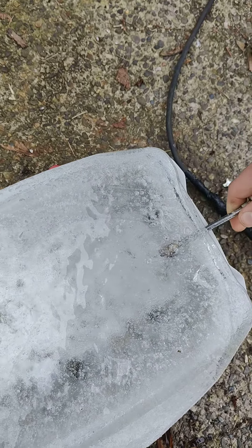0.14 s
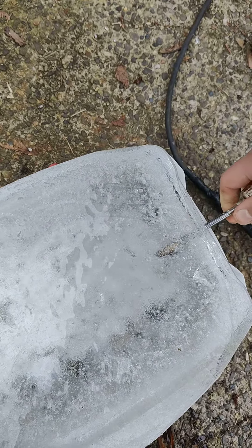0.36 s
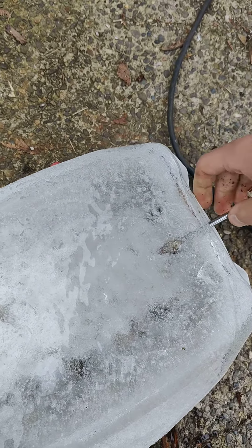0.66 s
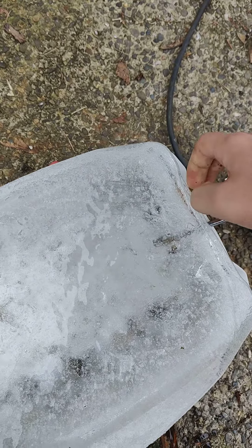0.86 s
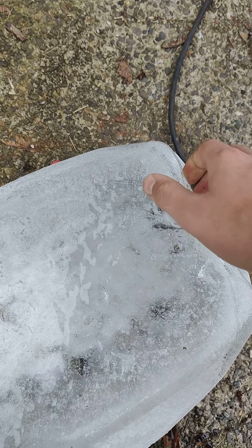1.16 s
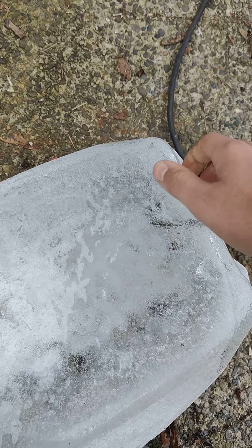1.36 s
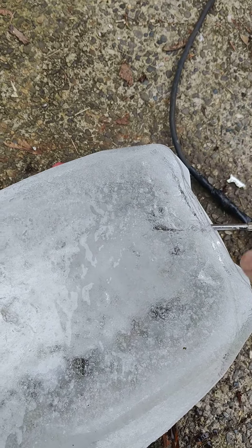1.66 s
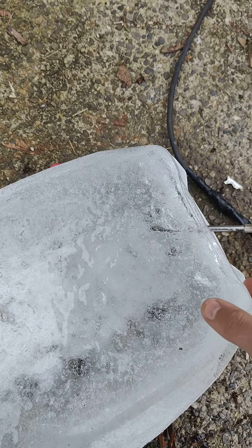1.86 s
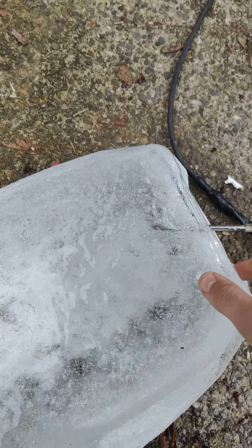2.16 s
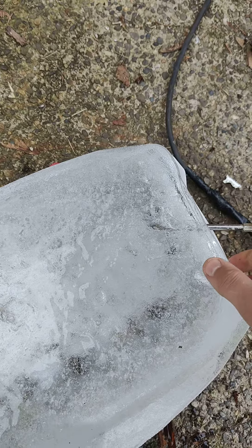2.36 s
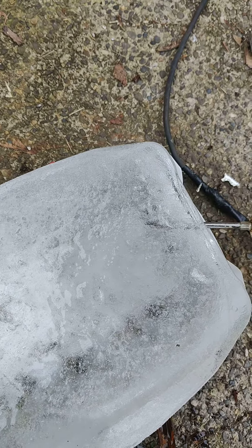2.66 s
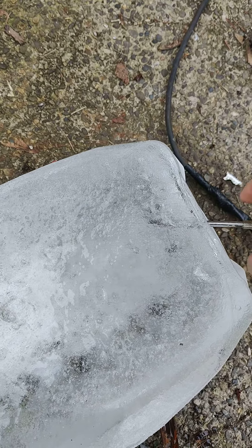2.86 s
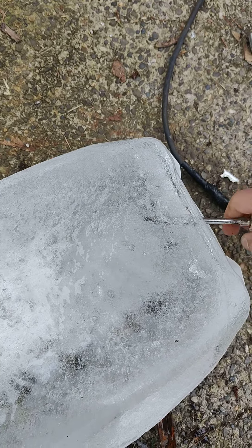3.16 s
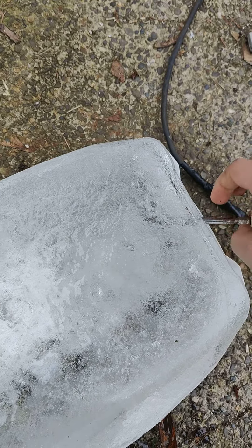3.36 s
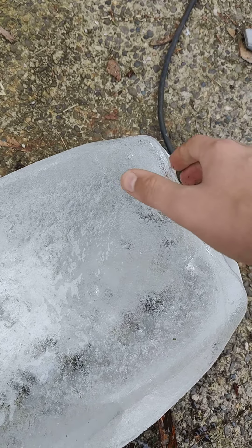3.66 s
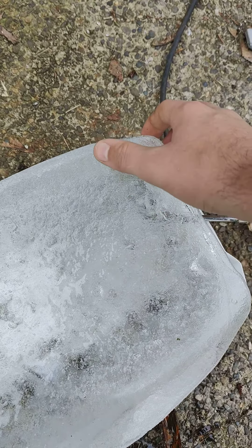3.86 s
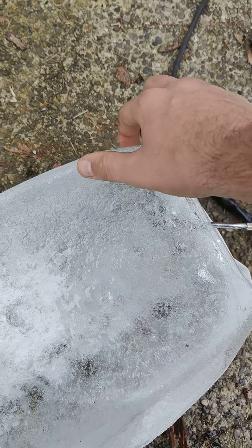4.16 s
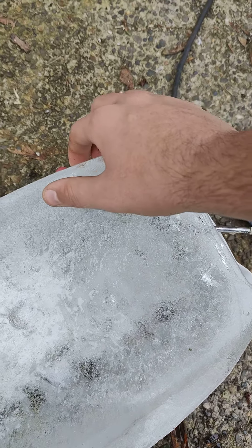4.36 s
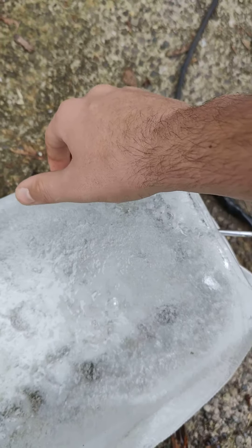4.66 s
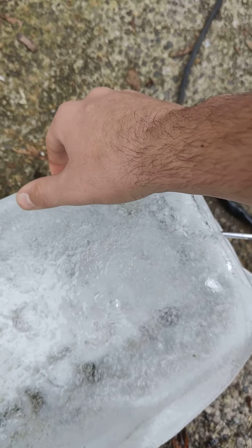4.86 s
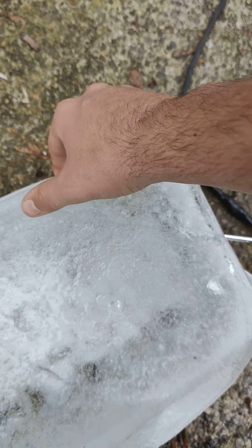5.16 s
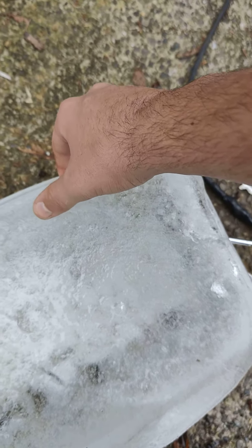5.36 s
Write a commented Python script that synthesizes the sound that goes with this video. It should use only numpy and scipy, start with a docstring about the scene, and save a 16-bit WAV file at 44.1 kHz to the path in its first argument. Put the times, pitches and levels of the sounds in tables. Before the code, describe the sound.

Ice is pried loose from a plastic tub with a thin metal tool, giving sharp cracks, hollow knocks and small scrapes outdoors.

```python
"""A quiet outdoor rumble, then cracks: a thin steel blade levers ice from a plastic tub on concrete. Each
brittle fracture is a burst of dense, fast-dying vibration that excites the damped modes of the hollow tub, the
ice slab, the plastic wall and the blade. Between cracks the tub knocks softly, the ice ticks and scrapes, and a
far vehicle passes. Meltwater squeaks once in a closing gap, and ice peels from the wall with a fine crackle
that swells near 4.8 s and again near 5.15 s, among the last cracks."""
import sys
import numpy as np
from scipy import signal
from scipy.fft import rfft, irfft, next_fast_len
from scipy.io import wavfile

SR = 44100
rng = np.random.default_rng(int(sys.argv[2]) if len(sys.argv) > 2 else 0)


def output_pcm(signal):
    """Save a mono or channel-first signal as 16-bit PCM at the path in sys.argv[1].

    Samples are clipped to [-1, 1] before scaling.
    """
    pcm = np.clip(np.atleast_2d(signal).T, -1, 1) * 32767
    wavfile.write(sys.argv[1], SR, np.round(pcm).astype(np.int16))


N = 242991
TIME = np.arange(N) / SR
RING_SAMPLES = 10800
AGE = np.arange(RING_SAMPLES) / SR  # seconds since a blow
THIRD_OCTAVES_HZ = 25 * 2 ** (np.arange(29) / 3)
SIDES = np.array([[1], [-1]])  # left, right


def undb(db):
    """Decibels to amplitude ratio."""
    return 10 ** (np.asarray(db) / 20)


def unit_rms(x):
    """Scale to rms 1."""
    return x / np.sqrt(np.mean(x ** 2))


def unit_blow(x):
    """Scale each channel to the energy of 10 ms at rms 1."""
    return x / np.sqrt(np.sum(x ** 2, axis=-1, keepdims=True) / (SR / 100) + 1e-18)


def at_hz(table, hz):
    """Interpolate a table's columns on a log-frequency axis."""
    f, *columns = np.transpose(table)
    return [np.interp(np.log(hz), np.log(f), column) for column in columns]


def add(out, start_s, sound):
    """Superpose a sound from start_s on."""
    i = int(start_s * SR)
    out[:, i:i + sound.shape[1]] += sound[:, :N - i]


def band_noise(hz, width_hz, size, patchy_db=0):
    """Two independent noises in one steep band; patchiness favours some frequencies, as mode clusters do."""
    n = next_fast_len(size, True)
    f = np.arange(n // 2 + 1) * SR / n
    passband = 1 / (1 + (2 * (f - hz) / width_hz) ** 6)
    clusters = np.interp(f, np.arange(100) * 240, rng.standard_normal(100))
    white = rfft(rng.standard_normal((2, n)))
    return unit_rms(irfft(white * passband * undb(patchy_db * clusters))[:, :size])


def third_octave(hz, correlation, size, patchy_db=0):
    """Partial coherence: mid and side noises mix into one stereo third-octave band."""
    mid, side = band_noise(hz, hz / 3.6, size, patchy_db)
    c = np.clip(correlation, -.99, .99)
    return np.sqrt((1 + c) / 2) * mid + np.sqrt((1 - c) / 2) * side * SIDES


def wander(rate_hz, size):
    """A continuous random fluctuation with a spread near 1."""
    steps = np.arange(size) * rate_hz / SR
    return np.interp(steps, np.arange(4096), rng.standard_normal(4096))


# Spectrum of the outdoor air. Each row: frequency in Hz, relative spectral density in dB.
AIR_SPECTRUM = [(15, -34.5), (25, -3.5), (69, -1), (139, -8), (191, -4.5), (224, -15), (488, -22.5),
                (529, -21), (729, -26), (1500, -29.5), (1960, -32), (2930, -28.5), (5280, -47.5),
                (13800, -54.5), (15000, -65.5)]
# Its stereo field. Each row: frequency in Hz, left minus right in dB, correlation of the channels.
AIR_FIELD = [(60, 2, 0.97), (193, .5, 0.97), (380, -1, .5), (700, 5, 0.22), (1300, -5, 0.26),
             (2405, 13.5, -0.45), (4400, 4.5, 0), (8000, 5, 0), (14690, -0.5, 0)]
def outdoor_air(level_db=-54):
    """Ambient noise, coherent at long wavelengths: a low rumble and faint hiss whose bands waver."""
    bands = 0
    for hz in THIRD_OCTAVES_HZ:
        pan_db, correlation = at_hz(AIR_FIELD, hz)
        band = third_octave(hz, correlation, N) * undb(SIDES * pan_db / 2)
        waver = undb(1.8 * wander(2.4, N))
        bands += np.sqrt(hz) * waver * band / np.std(band.mean(axis=0))  # equal power per Hz
    n = next_fast_len(N, True)
    colour_db = at_hz(AIR_SPECTRUM, np.arange(1, n // 2 + 2) * SR / n)[0]
    air = irfft(rfft(bands, n) * undb(colour_db), n)[:, :N]
    return air * undb(level_db) / np.std(air.mean(axis=0))


# Spectrum of a fracture. Each row: frequency in Hz, relative third-octave level in dB,
# left minus right in dB.
FRACTURE_SPECTRUM = [ (90.53, -26.5, 1.5), (174, -27.5, -1), (247, -8.5, 1), (322, -12.5, 4),
                     (450, 3.5, 8.5), (690.5, -13, 4.5), (953.6, -6, -4), (1705, -4.5, -4), (3200, -2, 1),
                     (4100, -5, -4.5), (5100, -13, -2), (6670, -11, 1), (7950, -18, 7.5),
                     (9810, -13.5, 6.5), (14500, -18, -5), ]
def fracture(thud_db, treble_db, t60, rise_s):
    """Modal overlap: a fracture runs in tiny jumps and shakes countless short modes that merge as noise."""
    jumps = undb(2.5 * wander(1400, RING_SAMPLES))
    ground_reflection = 1 + .5 * np.exp(-((AGE - .0062) / 0.0014) ** 2)
    attack = (1 - np.exp(-AGE / rise_s)) * jumps * ground_reflection
    yard_reverb = undb(-31) * np.exp(-np.log(1000) * AGE / 0.45)
    tilt = [(250, thud_db), (900, 0), (2000, 0), (8000, treble_db)]
    out = 0
    for hz in THIRD_OCTAVES_HZ[THIRD_OCTAVES_HZ > 90]:
        db, pan_db = at_hz(FRACTURE_SPECTRUM, hz)
        db += at_hz(tilt, hz)[0]
        band_t60 = t60 * (hz / 2000) ** -.13  # treble dies first
        decay = np.exp(-np.log(1000) * AGE / band_t60)
        correlation = 1 / (1 + (hz / 1200) ** 2)
        noise = third_octave(hz, correlation, RING_SAMPLES, patchy_db=5 * min(hz / 4000, 1))
        out += undb(db + SIDES * pan_db / 2) * unit_blow(noise * attack * (decay + yard_reverb))
    return out


def ring(modes, rise_s, pitch_hz=None, damping=1, scatter_db=0):
    """Free vibration is a sum of damped sines; pitch_hz retunes the first, damping divides decay times."""
    out = 0
    for k, (hz, db, t60, pan_db, lead) in enumerate(modes):
        if pitch_hz and k == 0:
            hz = pitch_hz
        # Where the blow lands scatters each mode's level and phase.
        offset_db, start_phase = scatter_db * rng.standard_normal(2)
        phase = 2 * np.pi * hz * AGE + start_phase + SIDES * lead / 2
        decay = np.exp(-np.log(1000) * AGE * damping / t60)
        out += undb(db + offset_db + SIDES * pan_db / 2) * np.sin(phase) * decay
    out *= 1 - np.exp(-AGE / rise_s)
    return out / np.sqrt(np.sum(out ** 2) / (2 * SR / 100))  # energy of 10 ms at rms 1


# Modes of the hollow tub. Each row: nominal frequency in Hz, relative level in dB, time to fall
# 60 dB in seconds, left minus right in dB, phase lead of the left in radians.
TUB_MODES = [(442.7, 14.5, 0.096, 3.5, -0.0059), (430, -8, 0.019, 4, .3), (267.1, -16, 0.18, -0.5, 0.29),
             (522, -16.5, .05, 2, .2), (700.5, -15.5, 0.043, 10, -.2)]
GRIPPED_HZ, LOOSE_HZ = 413.2, 440.2
FLOOR_LOOSE_S = 2.585  # between the two snaps of a double crack
def tub(start_s, rise_s, damping=1):
    """Resonance of a hollow body: the main mode rises once the ice lets go of the tub's floor."""
    pitch_hz = GRIPPED_HZ if start_s < FLOOR_LOOSE_S else LOOSE_HZ
    return ring(TUB_MODES, rise_s, pitch_hz, damping)


# The slab's one mode, with columns as for the tub; each crack sets its frequency.
SLAB_MODES = [(1014, 1, 0.078, -4.5, 1.35)]
def slab(pitch_hz):
    """Plate resonance: the ice slab rings at a pitch that shifts with how it is gripped."""
    return ring(SLAB_MODES, rise_s=0.0033, pitch_hz=pitch_hz)


# Modes of the plastic wall, frozen to the ice and free of it, with columns as for the tub.
FROZEN_WALL_MODES = [ (851, -2, 0.13, -2, 1.7), (941, -1, 0.079, -5, 1.3), (1023, 2.5, 0.068, -4, 1.5),
                     (1250, -14, 0.025, 1, -0.74), (1647, 0.5, 0.084, -9, -1.3),
                     (2060, -1.5, 0.054, -13, -2), (2824, 1, 0.056, 11, -2), (3080, -12, 0.053, 3, -1.4),
                     (3470, 5, 0.036, -5, -1.4), (4020, -9, 0.045, -15, -1.3), ]
FREE_WALL_MODES = [ (885, -2.5, .07, -2.5, 4), (895, -2, 0.072, -8.5, -2.5), (1049, -0.5, 0.11, -7, 0.1),
                   (1196, -7, 0.082, -5.5, 1.55), (1328, -8.5, .1, -2.5, .5), (1554, -4.5, .06, -5.5, 1),
                   (1640, -2, 0.05, -4.5, 1), (1769, -1, 0.084, -6, 1.97), (1858, -5, 0.082, -11.5, 3.5),
                   (2117, 0, .07, -2, 1.8), (2455, -6, .08, 1.5, -1.5), (2798, -8.5, .075, 2.5, -3.5),
                   (2980, -8.5, .06, 2.5, -3.5), (3640, -10.5, .065, 0, 4), (3820, -13, .06, -4.5, 5), ]
BREAKAWAY_S = 2.5
def wall(start_s):
    """Boundary conditions set the modes: the wall rings differently once the block has broken away."""
    modes = FROZEN_WALL_MODES if start_s < BREAKAWAY_S else FREE_WALL_MODES
    return ring(modes, rise_s=0.00069, scatter_db=2)


# Modes of the steel blade, with columns as for the tub.
BLADE_MODES = [(3150, 0.5, 0.054, 3.007, -2), (3035, -1, 0.03, 5.6, 1.2), (3330, -5, 0.044, 8.5, -5.5),
               (2680, -4.5, 0.018, 6.46, -2), (6380, -26, .09, 0.5, 1.5)]
def blade():
    """Bending vibration: the thin steel rings high and briefly."""
    return ring(BLADE_MODES, rise_s=.0005, scatter_db=2)


# The ice gives way. Each row: start in seconds, burst level in dB, treble shift in dB, burst's 60 dB
# decay time at 2 kHz in seconds, tub and slab levels in dB, slab pitch in Hz, wall and blade levels in dB.
ICE_CRACKS = [ (0.1857, -35, 6, 0.069, -33, -45, 950, -25, -36.5),
              (0.4532, -56, 6.5, .11, -51, -64, 1080, -50.5, -53),
              (2.5686, -25.5, -6.5, 0.068, -22.5, -9.5, 1014, -17, -36),
              (2.5995, -31, 4.5, .074, -16.5, -35, 1015, -27, -18),
              (3.5056, -35, -17, 0.053, -33.5, -19.5, 1043, -33, -57),
              (3.5115, -37, -22, .04, -43.5, -33, 1035, -30, -55),
              (4.774, -38, 9, 0.072, -31, -47, 1045, -36, -32),
              (5.0774, -24.5, -2.5, 0.088, -13, -18.5, 892, -17, -27),
              (5.134, -28.5, -6.5, .085, -42, -34, 998, -26.5, -33.5),
              (5.1568, -27, -12.5, 0.069, -24.5, -29, 1049, -26.5, -50),
              (5.1945, -50, 3, 0.064, -40.5, -49, 1040, -43, -60), ]
# A hard blow also thuds. Each row: mean of slab and wall levels in dB, bass shift of the burst in dB.
THUD_CURVE = [(-33, -13), (-17.5, -1), (-13, 6)]
def cracks():
    """Impulse excitation: each crack rings all four bodies, in shares set by where the ice breaks."""
    out = np.zeros((2, N))
    for start_s, db, treble_db, t60, tub_db, slab_db, slab_hz, wall_db, blade_db in ICE_CRACKS:
        thud_db = np.interp((slab_db + wall_db) / 2, *np.transpose(THUD_CURVE))
        crack = undb(db) * fracture(thud_db, treble_db, t60, rise_s=.0005)
        crack += undb(tub_db) * tub(start_s, rise_s=0.0026)
        crack += undb(slab_db) * slab(slab_hz)
        crack += undb(wall_db) * wall(start_s)
        crack += undb(blade_db) * blade()
        add(out, start_s, crack)
    return out


# The tub shifts and bumps. Each row: start in seconds, level in dB.
TUB_KNOCKS = [(.238, -48), (2.074, -45.5), (2.094, -48.5), (2.417, -55), (2.667, -44), (4.173, -52.5),
              (4.586, -53.5), (4.828, -51.5), (4.96, -51.5), (5.009, -50.5)]
HELD_FROM_S, HELD_TO_S = 4.0, 4.9
def knocks():
    """Contact damping: soft bumps ring only the tub, and die sooner while a hand presses its rim."""
    out = np.zeros((2, N))
    for start_s, db in TUB_KNOCKS:
        damping = 4.2 if HELD_FROM_S < start_s < HELD_TO_S else 1.1
        add(out, start_s, undb(db) * tub(start_s, rise_s=0.0047, damping=damping))
    return out


# Small slips of ice and blade. Each row: start in seconds, level in dB, rise time in seconds.
ICE_SLIPS = [ (.636, -70.5, 0.0018), (.695, -65, .0015), (.854, -69, .002), (2.336, -59.5, 0.00065),
             (2.391, -67, .002), (2.427, -62, 0.007), (2.657, -61, .001), (2.683, -63, .002),
             (3.424, -71, .002), (4.723, -63.5, .0015), (4.921, -56, .012), (5.005, -56.5, 0.0042),
             (5.386, -56, .018), (5.424, -66.5, 0.0018), (5.49, -64.5, 0.0016), ]
def slips():
    """A slower force has a narrower spectrum: quick slips tick brightly, slow ones give a duller scrape."""
    out = np.zeros((2, N))
    for start_s, db, rise_s in ICE_SLIPS:
        treble_db = 4 - 3.5 * np.log2(rise_s / .001)  # falls with each doubling of the rise time
        add(out, start_s, undb(db) * fracture(thud_db=-7, treble_db=treble_db, t60=0.077, rise_s=rise_s))
    return out


def far_vehicle(nearest_s=1.55, peak_db=-63.5, half_power_s=.2):
    """Spherical spreading: the noise of a passing vehicle varies inversely with its distance."""
    relative_distance = np.hypot(1, (TIME - nearest_s) / half_power_s)
    return band_noise(hz=450, width_hz=420, size=N) * undb(peak_db) / relative_distance


POCKET_OPEN_HZ, POCKET_CLOSED_HZ = 995, 1820
POCKET_CLOSES_S, POCKET_SLIDE_S = 2.712, 0.0036
def meltwater(start_s=2.655, length_s=0.11, ramp_s=0.01, level_db=-46, fade_db_per_s=180):
    """Cavity resonance: water squeezed through a fresh gap squeaks, rising as its air pocket shrinks."""
    closure = (1 + np.tanh((TIME - POCKET_CLOSES_S) / (2 * POCKET_SLIDE_S))) / 2
    hz = POCKET_OPEN_HZ + (POCKET_CLOSED_HZ - POCKET_OPEN_HZ) * closure
    phase = 2 * np.pi * np.cumsum(hz) / SR + .4 * SIDES
    age = np.clip(TIME - start_s, 0, length_s)
    gate = np.minimum(np.minimum(age, length_s - age) / ramp_s, 1)
    flutter = wander(250, N) + 1j * wander(380, N)  # unsteady amplitude and phase
    whistle = unit_rms(np.real(flutter * np.exp(1j * phase)))
    return whistle * gate * undb(level_db - fade_db_per_s * age)


# Ice peels from the wall. Each row: time of the peak in seconds, peak level in dB.
ICE_PEELS = [(4.80, -58), (5.15, -66)]
def peeling(rise_db_per_s=286.5, fade_db_per_s=100):
    """Adhesive failure: a fine crackle swells and fades as the ice lets go of the plastic."""
    fizz = band_noise(hz=9000, width_hz=12000, size=N, patchy_db=4.5)
    fizz += undb(4) * band_noise(hz=3940, width_hz=900, size=N)
    crackle = unit_rms(fizz * undb(4.3 * wander(300, N)))
    swell = 0
    for peak_s, db in ICE_PEELS:
        below_peak_db = np.maximum(rise_db_per_s * (peak_s - TIME), fade_db_per_s * (TIME - peak_s))
        swell += undb(db - below_peak_db)
    return crackle * swell


def scene():
    """Superposition: the sounds at the tub add to the outdoor background."""
    return cracks() + slips() + knocks() + meltwater() + peeling() + outdoor_air() + far_vehicle()


def record(dry, cutoff_hz=14400):
    """Band limiting: a steep elliptic low-pass removes the highest treble."""
    return signal.sosfilt(signal.ellip(8, .2, 70, cutoff_hz, fs=SR, output="sos"), dry)


dry = scene()
out = record(dry)
output_pcm(out)
```